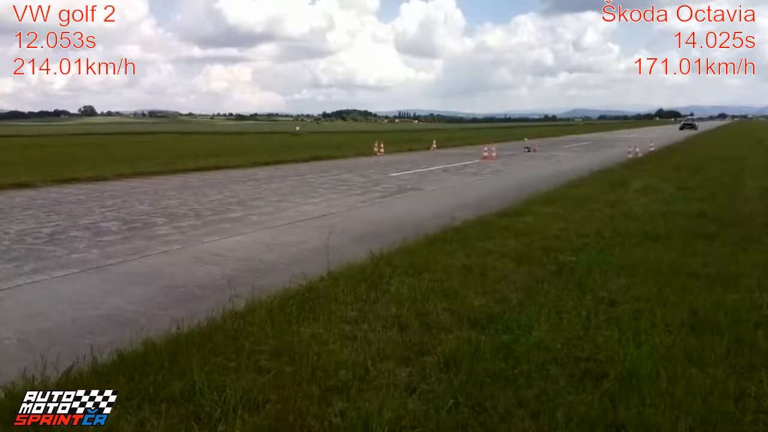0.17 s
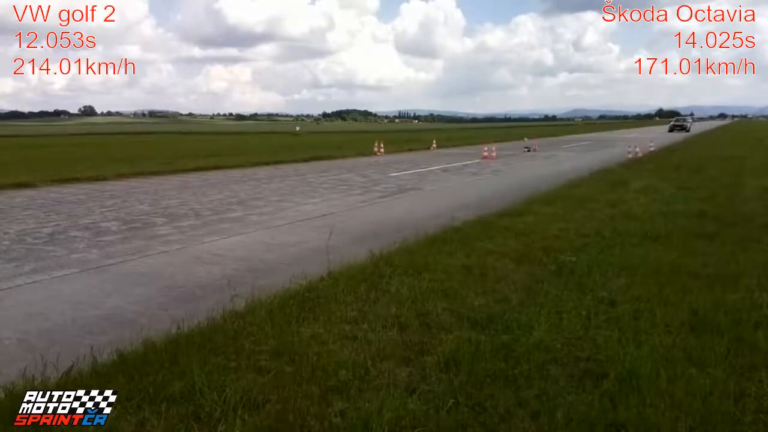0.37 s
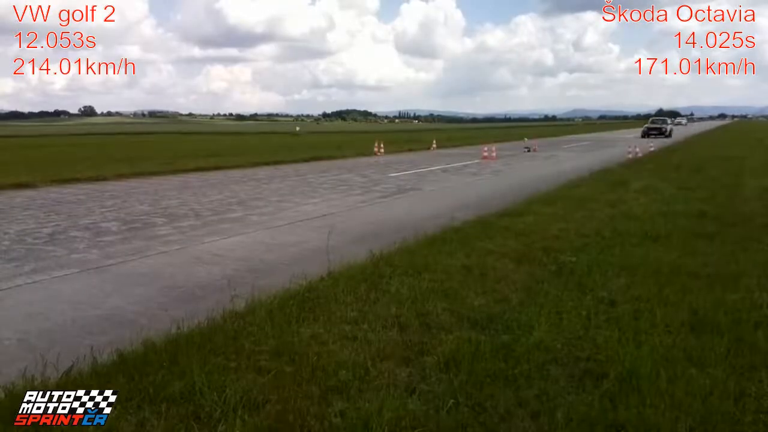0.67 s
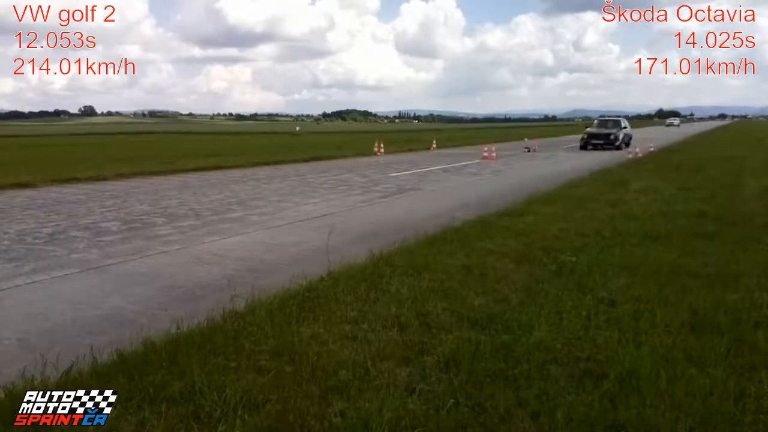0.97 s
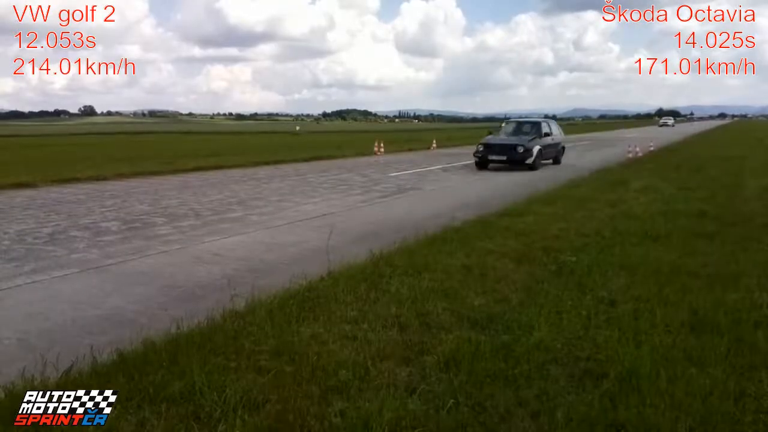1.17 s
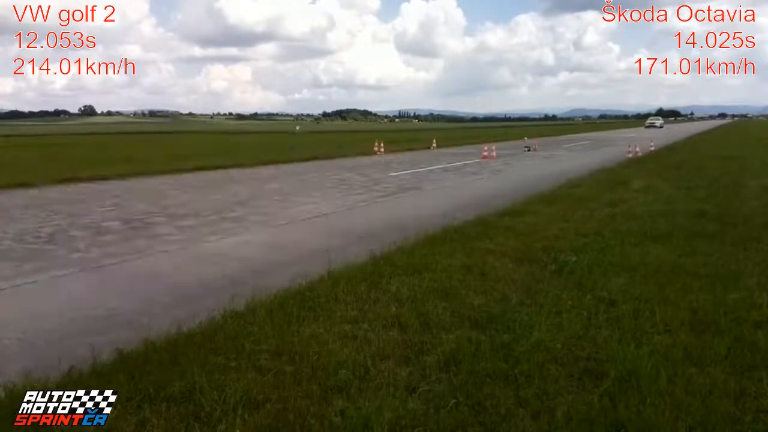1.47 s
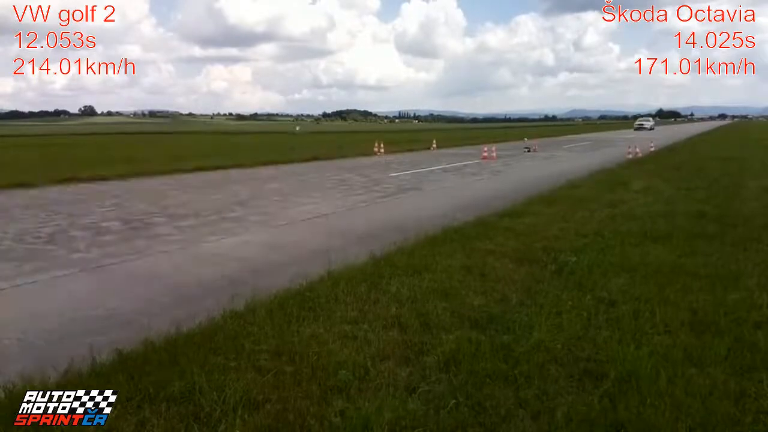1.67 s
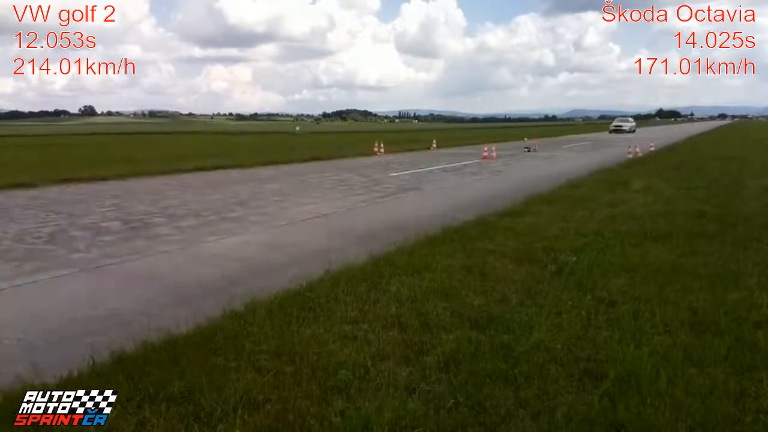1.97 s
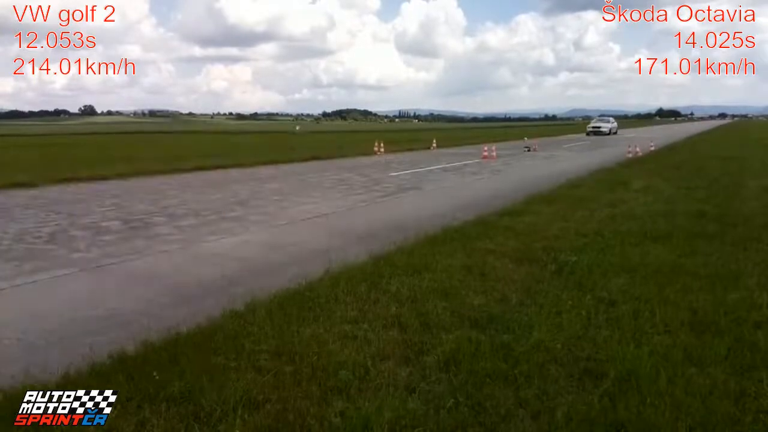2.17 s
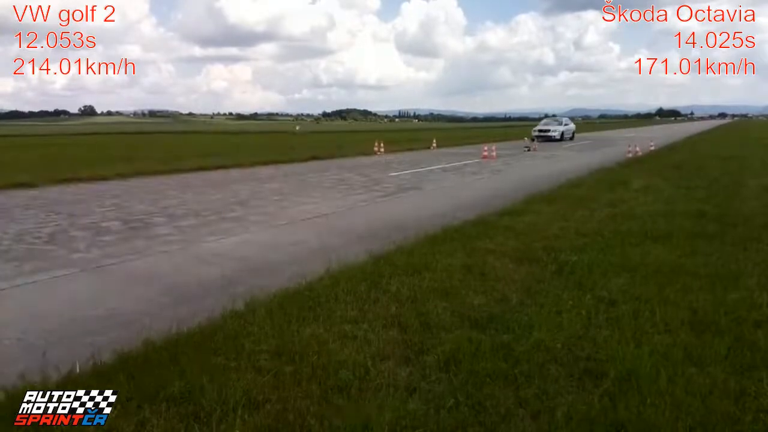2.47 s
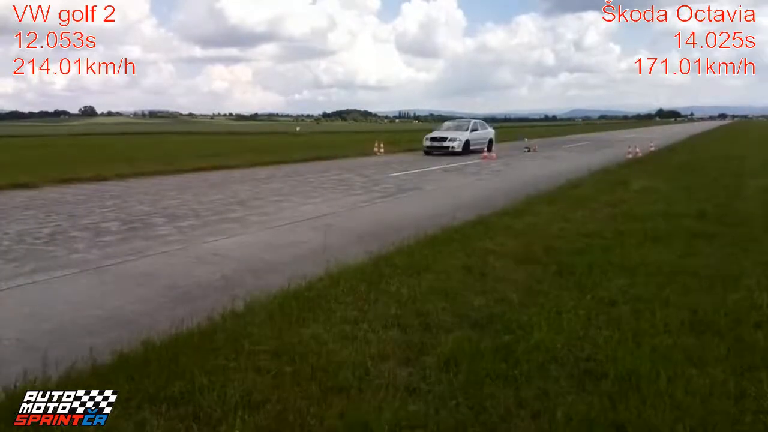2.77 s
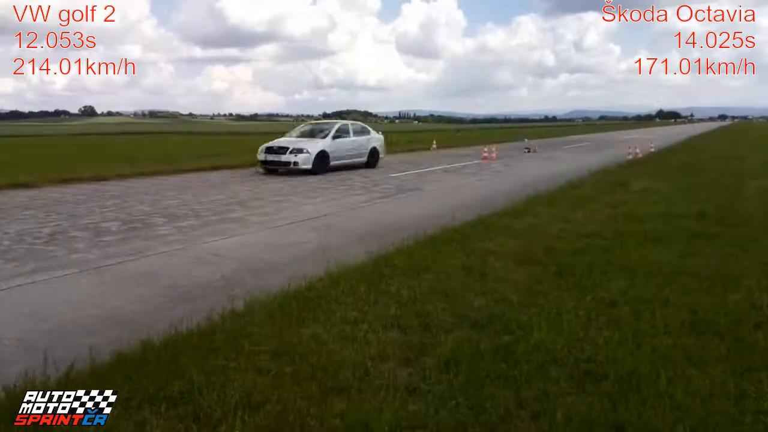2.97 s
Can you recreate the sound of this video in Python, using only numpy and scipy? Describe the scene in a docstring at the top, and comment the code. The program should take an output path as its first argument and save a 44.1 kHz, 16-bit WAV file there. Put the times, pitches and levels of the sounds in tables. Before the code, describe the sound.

A racing car swells in with a high engine note and tyre roar, whips past close with a low boom and falling pitch, then a second approaches. Outdoors, wind thumping a bare, overloading microphone on the verge.

```python
"""Two racing cars on a windy verge

Two cars race down an open concrete strip past a microphone on the grass verge.
Each sums tones tied to its firing rate, pulsed exhaust gas and banded roar noise, Doppler-shifted
by the changing path and thinned by soft ground. Low noise and bell-shaped pressure swings make the
wind; low booms and a faint band of hiss go with the first car. The input overloads at the peaks."""
import sys
import numpy as np
from scipy import signal
from scipy.fft import rfft, irfft, next_fast_len
from scipy.io import wavfile
from scipy.ndimage import uniform_filter1d, map_coordinates

SR = 44100
rng = np.random.default_rng(int(sys.argv[2]) if len(sys.argv) > 2 else 0)


def pcm_store(signal):
    """Save signal as 16-bit PCM."""
    levels = np.round(np.clip(np.atleast_2d(signal), -1, 1) * 32767)
    wavfile.write(sys.argv[1], SR, levels.astype(np.int16).T)


def volts(x):
    """Linear amplitude factor 10**(x/20) for a level x in dB, scalar or array-like."""
    e = np.asarray(x, float) / 20
    return 10 ** e


N = 137151


def table(rows, t, col=1):
    """Linear interpolation: one column of a time table, joined by straight lines."""
    rows = np.array(rows, float)
    return np.interp(t, rows[:, 0], rows[:, col])


def unit(x):
    """Normalisation: scale to rms 1."""
    return x / np.sqrt(np.mean(x ** 2))


def walk(rate_hz, n):
    """Slow random modulation: levels held 1 / rate, smoothed twice, scaled to spread 1."""
    hold = max(int(SR / rate_hz), 2)
    levels = rng.standard_normal(n // 50)[:n // hold + 1]
    x = np.repeat(levels, hold)
    x = uniform_filter1d(uniform_filter1d(x, hold), hold)[:n]
    return x / x.std()


def coloured(points, n, lo_hz=0., hi_hz=1e9):
    """Spectral shaping: noise with the given (frequency [Hz], density [dB per Hz]) between two edges."""
    f = np.fft.rfftfreq(n, 1 / SR) + 1e-3
    p = np.array(points, float)
    gain = volts(np.interp(np.log(f), np.log(p[:, 0]), p[:, 1]))
    gain = gain * (f >= lo_hz) * (f < hi_hz)
    return irfft(rfft(rng.standard_normal(n)) * gain, n)


def bump(t, at, length):
    """Gaussian pulse: a bell-shaped swell, its length taken between the 1/e points."""
    return np.exp(-(2 * (t - at) / length) ** 2)


def lowpass(x, hz):
    """Second-order Butterworth low-pass filtering."""
    return signal.sosfilt(signal.butter(2, hz, fs=SR, output="sos"), x)


def car_tones(phase, ahead, tones):
    """Additive synthesis: wavering multiples of the firing rate, those above the first beamed ahead."""
    waver_db, waver_hz = 2, 30  # spread at the third multiple
    total = 0
    for k, db in tones:
        if k % 1:  # in-between multiples beam tightest
            beam = ahead ** 15
        elif k > 2.9:
            beam = ahead
        elif k > 1:
            beam = np.sqrt(ahead) + 0.29
        else:
            beam = 1
        level = volts(db + waver_db * np.sqrt(k / 3) * walk(waver_hz, len(phase)))
        total = total + level * np.sin(2 * np.pi * (k * phase + rng.random())) * beam
    return unit(total)


def exhaust_gas(phase):
    """Pulsed jet noise: hiss peaking at 2830 Hz, released once a firing and then decaying."""
    decay_share = 0.99  # decay constant as a share of the firing cycle
    hiss = coloured([(300, -20), (2830, 0), (15000, -10)], len(phase))
    return unit(np.exp(-(phase % 1) / decay_share) * hiss)


def roar_noise(colour, n):
    """Broadband tyre and air noise: octave bands swell together over uneven slabs and flicker singly."""
    bump_db, flicker_db = .8, 1.3
    slabs = bump_db * walk(9, n)
    rush = 0
    for lo in 30 * 2. ** np.arange(11):
        rush = rush + volts(slabs + flicker_db * walk(18, n)) * coloured(colour, n, lo, 2 * lo)
    return unit(rush)


def over_grass(near, r, arrives):
    """Ground absorption: soft ground cancels a band around 324-1000 Hz, more so with distance."""
    half_m = 22  # cancellation is weighted by one half here
    far = np.interp(np.arange(N) / SR, arrives, r / (r + half_m))
    return near - far * signal.lfilter(*signal.butter(1, (324, 1000), "band", fs=SR), near)


def car(passing, revs, heard, tones, colour):
    """Doppler effect: sound made along a straight path arrives after a delay that follows distance."""
    speed, abreast, lane = passing
    gas_db, rev_wobble, treble_hz = -14, .003, 1770  # gas against roar; share of the revs; crossover
    lead = SR // 2  # the car starts early, so that its first sound has time to arrive
    n = next_fast_len(N + lead)
    made = (np.arange(n) - lead) / SR
    r = np.hypot(speed * (made - abreast), lane)
    arrives = made + (r - lane) / 343  # speed of sound [m/s]; no delay when abreast

    phase = np.cumsum(table(revs, arrives) * (1 + rev_wobble * walk(12, n))) / SR
    ahead = ((1 + speed * (abreast - made) / r) / 2) ** 2  # 1 straight ahead of the car, 0 behind
    tone = volts(table(heard, arrives, col=2)) * car_tones(phase, ahead, tones)
    source = tone + volts(gas_db) * exhaust_gas(phase) + roar_noise(colour, n)

    t = np.arange(N) / SR
    near = map_coordinates(source, [np.interp(t, arrives, np.arange(n))], order=3)
    near = over_grass(near, r, arrives)
    body = signal.lfilter(*signal.butter(1, treble_hz, fs=SR), near)
    treble = volts(table(heard, t, col=3)) * (near - body)
    return (body + treble) * volts(table(heard, t))


# straight pass: speed [m/s], heard abreast [s], distance of the lane [m]
FIRST_PATH = (62, 1.455, 5.0)
# engine speed: (time heard [s], firing rate at the engine [Hz])
FIRST_FIRING = [(0, 230), (.5, 236), (.7, 247), (.95, 249), (1.02, 254), (1.27, 254), (1.5, 257),
                (1.75, 253), (2.0, 248), (3.2, 248)]
# balance at the verge: (time [s], gain [dB], tones over roar [dB], treble gain [dB])
FIRST_LEVELS = [(0, -51.5, 7, -29), (0.199, -33, -9.5, -28), (0.398, -29.5, -8.5, -10),
                (0.598, -31.5, -6, -1.5), (0.751, -22, -6, -3), (0.85, -22.5, -3, 5.5),
                (0.998, -16.5, -4.5, -0.5), (1.102, -10.5, -9, -1), (1.203, -8.5, -7.5, 2),
                (1.26, -9, -8.5, 0), (1.33, -6.5, 1, 3.5), (1.419, -8.5, 3, 7.5), (1.471, -11, -5, 0),
                (1.53, -20, -3, 6), (1.631, -31.5, 0.5, 9.5), (1.748, -32.5, -9, 5), (1.9, -42, -6, 10),
                (2.2, -49.5, 10.5, -1.5), (3.11, -47, 3.5, -3)]
# engine harmonics and, at 3.67, a whine of gears or tyre tread:
# (multiple of the firing rate, relative level [dB])
FIRST_TONES = [(1, -1.5), (2, -0.5), (2.5, -20.5), (3, 0), (3.67, -1.5), (4, -10.5), (5, -31)]
# tyre and air roar at the car: (frequency [Hz], relative density [dB per Hz])
FIRST_COLOUR = [(40, -22), (120, -3), (300, -1), (500, 2), (900, 0), (1200, 0), (2000, -9.5), (2800, -13),
                (5000, -21.5), (14000, -41.5)]


def first_car():
    """Moving source: the faster car in the nearer lane, its pitch falling as it passes."""
    return car(FIRST_PATH, FIRST_FIRING, FIRST_LEVELS, FIRST_TONES, FIRST_COLOUR)


# straight pass: speed [m/s], heard abreast [s], distance of the lane [m]
SECOND_PATH = (47, 3.32, 7.4)
# engine speed: (time heard [s], firing rate at the engine [Hz])
SECOND_FIRING = [(0, 202.1), (2.6, 204.7), (3.2, 209)]
# balance at the verge: (time [s], gain [dB], tones over roar [dB], treble gain [dB])
SECOND_LEVELS = [(0, -38, -8, -10.5), (1.601, -67.5, 0, -27), (2.0, -39.5, -3, 0.5), (2.3, -37, -18, -10),
                 (2.5, -33.5, -13, -10.5), (2.598, -31.5, -4.5, -5), (2.671, -24.5, -10.5, -2.5),
                 (2.751, -27, 0.5, -5.5), (2.801, -18, -6.5, -6), (2.85, -14.5, -5, -1.5),
                 (2.95, -14.5, -3.5, 2), (3.042, -13.5, -2.5, 0), (3.067, -12.5, -8, 6),
                 (3.11, -26, -1.5, 17.5)]
# tones of the car, one between whole multiples: (multiple of the firing rate, relative level [dB])
SECOND_TONES = [(1, -5.5), (2, -6.5), (3, -9.5), (3.8, -2.5), (5, -11)]
# tyre and air roar at the car: (frequency [Hz], relative density [dB per Hz])
SECOND_COLOUR = [(40, -18.5), (120, 1.5), (300, 2), (500, 7), (950, 5.5), (1400, -0.5), (2400, -6),
                 (5000, -17.5), (14000, -51)]


def second_car():
    """Moving source: the slower car, still approaching when the sound ends."""
    return car(SECOND_PATH, SECOND_FIRING, SECOND_LEVELS, SECOND_TONES, SECOND_COLOUR)


# strength of the wind on the microphone: (time [s], level [dB])
WIND_LEVEL = [(0, -22.5), (.3, -22.5), (1.1, -19), (1.6, -23), (2.1, -22), (2.42, -16), (2.48, -18.5),
              (2.78, -22), (2.82, -20.5), (3.11, -42)]
# spectrum of the wind: (frequency [Hz], relative density [dB per Hz])
WIND_SPECTRUM = [(1, -8), (3, -5), (12, -5), (32, -4), (62, -21), (150, -35), (500, -48), (2000, -76)]


def wind_rumble():
    """Turbulence: random pressure on the bare capsule, deep, mostly below about 50 Hz."""
    return unit(coloured(WIND_SPECTRUM, N)) * volts(table(WIND_LEVEL, np.arange(N) / SR))


# strongest swings of wind pressure: (time [s], relative pressure, length [s])
GUSTS = [(.258, -.5, .025), (.287, .6, .03), (.35, -.5, .05), (.379, .4, .025), (.45, -.45, .04),
         (.486, .75, .035), (.6, .35, .03), (.643, -.55, .05), (.823, .6, .035), (.86, -.35, .04),
         (.96, -.5, .04), (1.04, .3, .1), (1.536, .3, .06), (1.68, -.4, .08), (1.762, .5, .06),
         (1.83, -.4, .05), (2.145, .45, .05), (2.185, -.4, .035), (2.261, -.45, .03), (2.316, -.4, .03),
         (2.287, .3, .02), (2.351, .85, .04), (2.414, -.55, .06), (2.452, -.7, .015), (2.468, .55, .018),
         (2.497, .78, .028), (2.525, .65, .022), (2.56, -1.4, .045), (2.595, .45, .03), (2.663, -.85, .04),
         (2.7, .45, .025), (2.727, 1.08, .03), (2.765, -.85, .03), (2.82, .3, .05), (3.0, .4, .12),
         (3.058, .35, .03), (3.095, -.7, .04)]


def wind_buffets():
    """Stagnation pressure: single gusts push or pull the capsule in smooth swings."""
    t = np.arange(N) / SR
    return sum(pressure * bump(t, at, length) for at, pressure, length in GUSTS)


# low booms of the first car, one as it nears and one as it passes: (time [s], level [dB], length [s])
BOOMS = [(1.194, -30, 0.03), (1.457, -6, 0.035)]
# spectrum of the booms: (frequency [Hz], relative density [dB per Hz])
BOOM_SPECTRUM = [(25, -22), (60, -3.5), (200, 0), (500, -18.5), (1500, -22)]


def low_booms():
    """Amplitude modulation: low noise under two short bell-shaped swells booms with the first car."""
    t = np.arange(N) / SR
    swell = sum(volts(db) * bump(t, at, length) for at, db, length in BOOMS)
    return unit(coloured(BOOM_SPECTRUM, N)) * swell


def whistle():
    """Narrow-band noise: a faint airy whistle that swells and fades behind the first car."""
    hz, width, db = 3120, 150, -54
    shape = [(hz - width, -20), (hz, 0), (hz + width, -20), (hz + 2 * width, -80)]
    band = unit(coloured(shape, N, hz - 2 * width))
    swell = np.interp(np.arange(N) / SR, (1.6, 1.9, 2.45), [0, 1, 0])
    return volts(db + 2 * walk(20, N)) * band * swell


def scene():
    """Superposition: the pressures of both cars, the wind, the booms and the whistle add up."""
    cars = first_car() + second_car()
    air = wind_rumble() + wind_buffets() + low_booms() + whistle()
    return (cars + air)[None]


# resonances of the camera housing: (frequency [Hz], width [Hz], gain of the added ringing [dB])
HOUSING_MODES = [(1220, 207, -9.5), (1750, 175, -14), (3150, 1160, -13.5)]


def ring_housing(x):
    """Resonance: the modes of the housing ring along with the direct sound."""
    ringing = 0
    for hz, width, db in HOUSING_MODES:
        ringing = ringing + volts(db) * signal.lfilter(*signal.iirpeak(hz, hz / width, fs=SR), x)
    return x + ringing


def overload(x):
    """Saturation: peaks flatten towards a ceiling around a slightly off-centre zero, after a fade-in."""
    ceiling, knee, offset, fade_in_s = .99, 24., 0.016, .03
    x = (x + offset) / ceiling * np.minimum(np.arange(N) / SR / fade_in_s, 1)
    return ceiling * x / (1 + np.abs(x) ** knee) ** (1 / knee)


def gain_control(x):
    """Dynamic compression: gain falls as the short-time power left after removing the bass rises."""
    squeeze, window_s = .6, .05
    power = uniform_filter1d((x - lowpass(x, 100)) ** 2, int(window_s * SR))
    return x / (1 + squeeze * power)


def band_limit(x):
    """A steep low-pass at the top of the band."""
    return signal.sosfilt(signal.butter(12, 9800, fs=SR, output="sos"), x)


def record(dry):
    """Signal chain: the housing rings, the input overloads, and gain control leans on loud sound."""
    mix = gain_control(overload(ring_housing(dry)))
    return band_limit(mix)


dry = scene()
out = record(dry)
pcm_store(out)
```